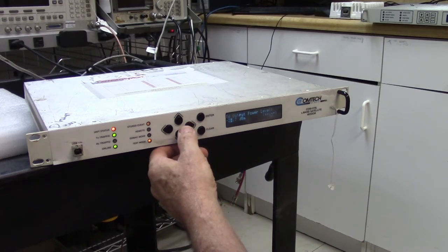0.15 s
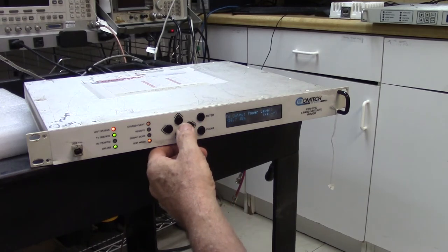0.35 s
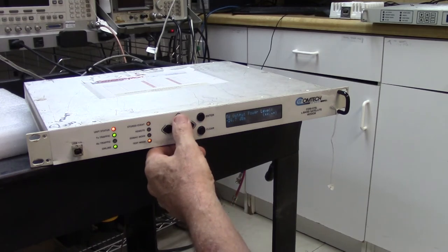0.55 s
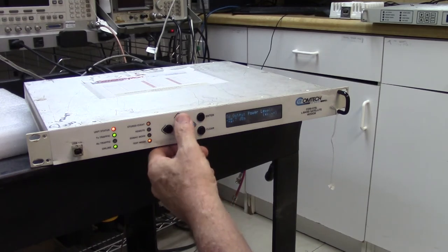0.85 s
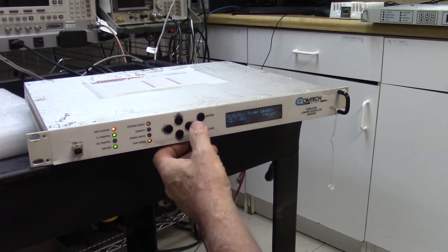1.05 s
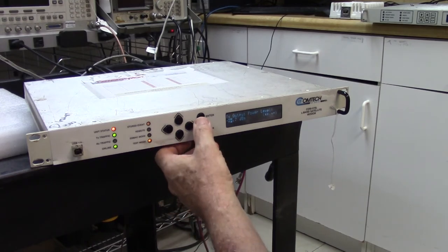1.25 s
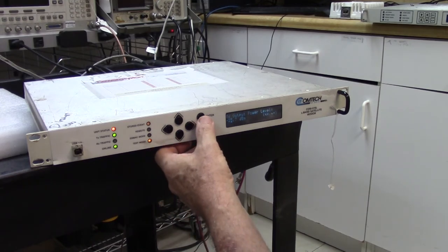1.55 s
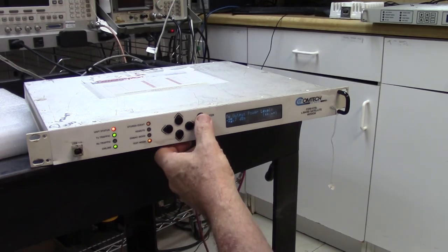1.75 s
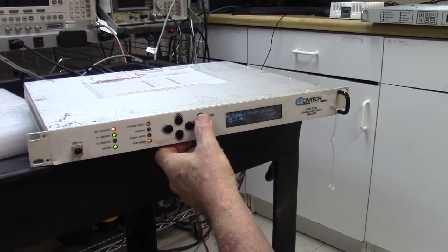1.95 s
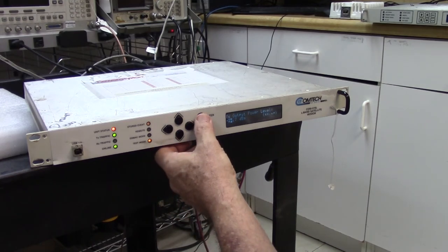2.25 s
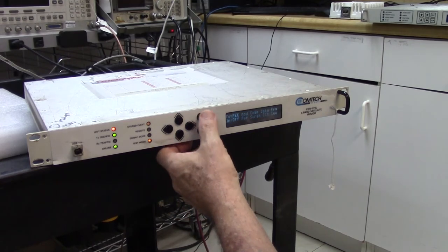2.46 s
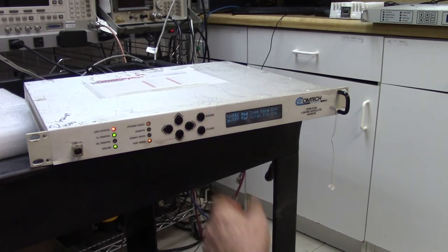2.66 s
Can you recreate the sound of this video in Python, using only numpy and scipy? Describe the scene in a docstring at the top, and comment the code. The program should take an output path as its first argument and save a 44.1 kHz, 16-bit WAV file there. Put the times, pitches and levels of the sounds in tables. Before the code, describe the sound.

Loud steady cooling-fan whine and rushing air from a rack amplifier, with faint key clicks

```python
"""A five-bladed fan whines in a rack amplifier on a workshop bench, its cooling running at full airflow.
The whine is a stack of partials locked to one rotor; two small fast fans add thin, wavering tones.
Air rushes through the case as noise coloured by resonances, over a trace of mains hum.
A hand on the front-panel keys makes a few faint clicks, short noise bursts ringing in the keys;
as it moves across, the balance of the tones and the air shifts."""
import sys
import numpy as np
from scipy import signal
from scipy.fft import rfft, irfft
from scipy.io import wavfile

SR = 44100
rng = np.random.default_rng(int(sys.argv[2]) if len(sys.argv) > 2 else 0)


def file_out(sig):
    """Save sig as 16-bit WAV at sys.argv[1]."""
    # one column per channel
    cols = np.atleast_2d(sig).T
    # limit, then scale
    lim = np.clip(cols, -1, 1)
    pcm = np.round(lim * 32767).astype(np.int16)
    wavfile.write(sys.argv[1], SR, pcm)


N = 123479

HAND_MIDWAY_S, HAND_TAKES_S = 1.76, 0.76
WAVER_PER_S = 2.4  # rate of the slow level waver, drawn separately for each fan tone


def from_db(db):
    """Decibels to amplitude gain."""
    return 10 ** (np.asarray(db) / 20)


def rms_one(x):
    """Scale to an rms of 1, over all rows together."""
    return x / np.sqrt(np.mean(x ** 2) + 1e-20)


def seconds():
    """Time of every sample."""
    return np.arange(N) / SR


def curve(points):
    """Straight lines between (t/s, value) points, at every sample."""
    return np.interp(seconds(), *np.transpose(points))


def drift(rate_hz):
    """Slow random motion with a spread of 1: noise through two equal low-pass poles."""
    step, warm_up = 100, 1000  # samples per drift point; drift points thrown away
    pole = np.exp(-2 * np.pi * rate_hz * step / SR)
    noise = rng.standard_normal(N // step + warm_up + 2)
    slow = signal.lfilter([1], [1, -2 * pole, pole ** 2], noise)[warm_up:]
    slow = rms_one(slow - slow.mean())
    return np.interp(np.arange(N) / step, np.arange(len(slow)), slow)


def hand_moved():
    """Goes from 0 to 1 as the hand crosses the panel."""
    return np.clip((seconds() - HAND_MIDWAY_S) / HAND_TAKES_S + 0.5, 0, 1)


def rotor_angle(speed_hz, wander):
    """Angle of a rotor: its speed summed over time, wandering by a small share of itself."""
    return 2 * np.pi * np.cumsum(speed_hz * (1 + wander * drift(3.1))) / SR


def tone(angle, level_db):
    """A partial at the given rms level."""
    return np.sqrt(2) * from_db(level_db) * np.cos(angle)


# Speed of the main fan before its wander: (t/s, f/Hz as turns per second)
FAN_SPEED = [(0, 55.23), (.85, 55.205), (1.7, 55.265), (2.15, 55.315), (2.8, 55.325)]
# Blade-passing tone and its overtones, {multiple of the speed:
# (level/dB before the hand moves, level/dB after)}
BLADE_TONES = {5: (-31, -31), 10: (-38, -38.5), 15: (-23.5, -24.5), 20: (-47, -48.5), 25: (-34.5, -30),
               30: (-31.3, -36), 35: (-40.5, -40), 40: (-33, -30.5), 45: (-47, -46), 50: (-42.5, -40),
               55: (-47, -49.5), 60: (-64, -53), 65: (-51, -55)}
# Tones from unequal blades and the motor, {multiple of the speed:
# (level/dB before the hand moves, level/dB after)}
ROTOR_TONES = {9: (-59, -57), 12: (-58, -59), 16: (-32.5, -33), 19: (-50, -56), 24: (-32.5, -30),
               26: (-58, -50), 28: (-55, -50), 31: (-36, -38.5), 33: (-52, -60), 34: (-56, -48),
               36: (-56, -44), 38: (-51, -53), 39: (-49.5, -58), 41: (-44, -39), 44: (-53, -44),
               46: (-44.5, -46.5), 64: (-59.5, -59)}
# Swell added to the strongest whine, the third multiple of the blade rate: (t/s, level/dB)
STRONGEST_SWELL = [(0, -1.3), (.25, 0), (.75, 0), (1.45, 1), (2.0, 0), (2.45, 0.8), (2.7, -1.2),
                   (2.8, -0.5)]
STRONGEST_ORDER = 15
BLADE_SCATTER_RAD = 0.78  # how far the overtones are out of step with the blade pulse
FAN_WANDER = 0.00011  # share of the speed
WAVER_DB, FLUTTER_DB, FLUTTER_PER_S = 0.48, 0.24, 13


def main_fan():
    """Blade pulses and once-a-turn unevenness, all locked to one rotor and shaken by the inflow."""
    angle = rotor_angle(curve(FAN_SPEED), FAN_WANDER)
    moved = hand_moved()
    whine = np.zeros(N)
    for order, (before_db, after_db) in (BLADE_TONES | ROTOR_TONES).items():
        level_db = before_db + moved * (after_db - before_db)
        level_db = level_db + WAVER_DB * drift(WAVER_PER_S)
        level_db = level_db + FLUTTER_DB * drift(FLUTTER_PER_S)
        if order == STRONGEST_ORDER:
            level_db = level_db + curve(STRONGEST_SWELL)
        scatter = BLADE_SCATTER_RAD if order in BLADE_TONES else np.pi
        phase = scatter * rng.uniform(-1.02, 1)
        whine += tone(order * angle + phase, level_db)
    return whine


# Rush of air, its broad colour before the overall level is set: (f/Hz, spectral density/dB per Hz)
AIR_COLOUR = [(20, 2), (60, -5), (140, -8.5), (250, -0.5), (450, 0), (1050, 0), (1800, -5.5), (2600, -6.5),
              (3300, -11), (4400, -13.5), (6200, -15.5), (7800, -18.5), (9200, -26), (12000, -29.5),
              (14000, -39), (15600, -44)]
# Resonances of the case and its vents:
# (f/Hz, width/Hz, lift/dB before the hand moves, lift/dB after)
CASE_RESONANCES = [(1332, 104, 9, 6.5), (1610, 45, 5.5, 3), (2220, 120, 4.5, 5), (5280, 390, 4.5, 1),
                   (5680, 300, 1.5, 2.5), (6840, 530, 2, 1.5), (9500, 1500, -1, 1)]
AIR_DB, AIR_FLICKER_DB, AIR_FLICKER_PER_S = -31.5, 0.2, 12


def airflow():
    """Smooth turbulence, coloured by the resonances of the case as heard past the hand."""
    hz = np.maximum(np.arange(N // 2 + 1) * SR / N, 1)
    points_hz, points_db = np.transpose(AIR_COLOUR)
    colour_db = np.interp(np.log(hz), np.log(points_hz), points_db)
    for centre, width, before_db, after_db in CASE_RESONANCES:
        bump = 1 / (1 + (2 * (hz - centre) / width) ** 2)
        colour_db = colour_db + np.array([[before_db], [after_db]]) * bump
    # one noise in two colours, so the crossfade is only a change of colour
    spectrum = rfft(rng.standard_normal(N))
    before, after = rms_one(irfft(spectrum * from_db(colour_db), N))
    rush = before + hand_moved() * (after - before)
    return rush * from_db(AIR_DB + AIR_FLICKER_DB * drift(AIR_FLICKER_PER_S))


# Partials of the two small fans, {multiple of the speed: level/dB}
SMALL_FAN_A = {1: -48, 5: -44, 10: -54, 16: -56.5, 30: -59}
SMALL_FAN_B = {1: -56, 5: -42, 16: -55.5, 30: -60, 35: -68, 40: -66}
SMALL_FAN_A_HZ, SMALL_FAN_B_HZ = 186.9, 192.42  # turns per second
SMALL_WANDER, SMALL_WAVER_DB = 0.00042, 2  # share of the speed; spread of each level


def small_fan(speed_hz, partials):
    """Thin whine of a small fast fan: multiples of its speed, each wavering in level."""
    angle = rotor_angle(speed_hz, SMALL_WANDER)
    whine = np.zeros(N)
    for order, db in partials.items():
        phase = rng.uniform(0, 2 * np.pi)
        whine += tone(order * angle + phase, db + SMALL_WAVER_DB * drift(WAVER_PER_S))
    return whine


# Key clicks, strength of the burst that drives the key: (t/s, level/dB)
CLICKS = [(0.7596, -27.5), (.777, -42), (.8598, -39), (2.357, -30.5), (2.3592, -34), (2.363, -41)]
# Resonances of a plastic key: (f/Hz, width/Hz, relative level/dB)
KEY_RESONANCES = [(3800, 900, -2), (5140, 820, 0), (7000, 1200, -5.5), (13000, 1300, -18)]
CLICK_DECAY_S, CLICK_TAIL_DB, CLICK_TAIL_S = 0.0012, -19.5, 0.013  # tail is relative to the snap


def keys():
    """Each snap is a short gritty burst with a faint tail, through the damped resonances of the key."""
    force = np.zeros(N)
    for start_s, db in CLICKS:
        age = np.maximum(seconds() - start_s, 0)
        snap = np.exp(-age / CLICK_DECAY_S)
        tail = from_db(CLICK_TAIL_DB) * np.exp(-age / CLICK_TAIL_S)
        force += (age > 0) * from_db(db) * (snap + tail)
    clicks = np.zeros(N)
    for hz, width, db in KEY_RESONANCES:
        band = signal.butter(2, [hz - width / 2, hz + width / 2], "band", fs=SR, output="sos")
        # a fresh noise per band; the tiny offset keeps the filter off exact zero
        grit = force * rng.standard_normal(N) + 1e-18
        evened = np.sqrt(SR / (2 * width))  # makes up for the power lost to a narrow band
        clicks += from_db(db) * evened * signal.sosfilt(band, grit)
    return clicks


def mains_hum():
    """A trace of mains hum: one steady sine."""
    return tone(2 * np.pi * 120 * seconds(), -58.5)  # Hz, dB rms


def scene():
    """Three fans, their air, the keys and a trace of mains hum."""
    whine = main_fan()
    air = airflow()
    thin_tones = small_fan(SMALL_FAN_A_HZ, SMALL_FAN_A) + small_fan(SMALL_FAN_B_HZ, SMALL_FAN_B)
    return (whine + air + thin_tones + keys() + mains_hum())[None]


def record(dry):
    """Cut the deepest rumble below 14 Hz and, steeply, the top above 15730 Hz."""
    rumble_cut = signal.butter(2, 14, "high", fs=SR, output="sos")
    top_cut = signal.ellip(12, 0.1, 80, 15730, fs=SR, output="sos")  # 0.1 dB ripple, 80 dB stop
    return signal.sosfilt(top_cut, signal.sosfilt(rumble_cut, dry))


dry = scene()
out = record(dry)
file_out(out)
```